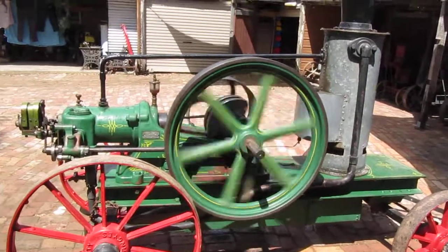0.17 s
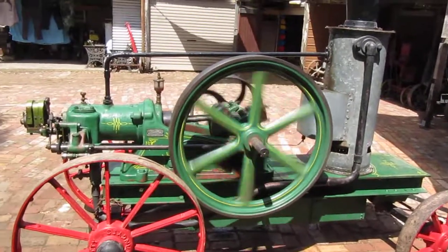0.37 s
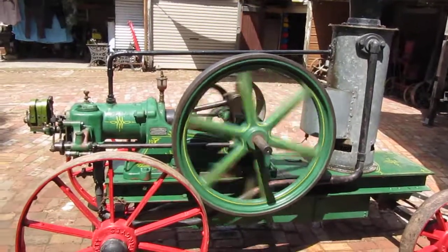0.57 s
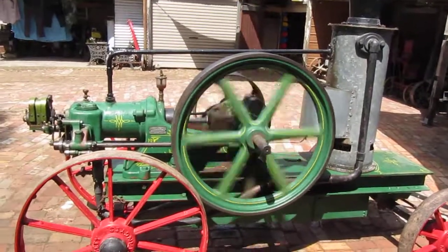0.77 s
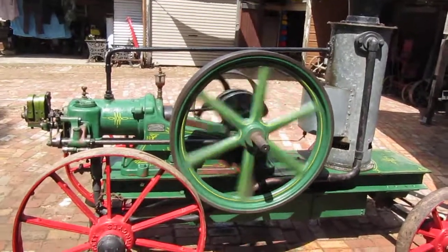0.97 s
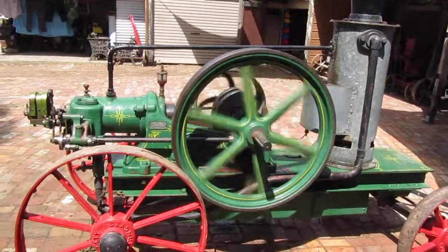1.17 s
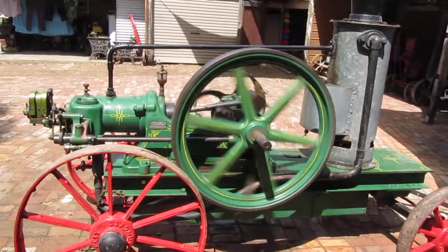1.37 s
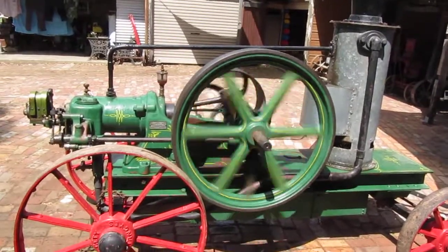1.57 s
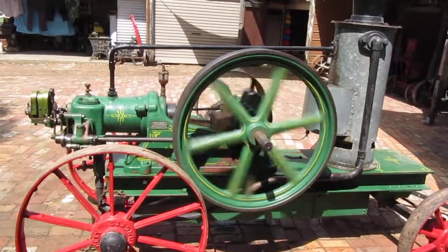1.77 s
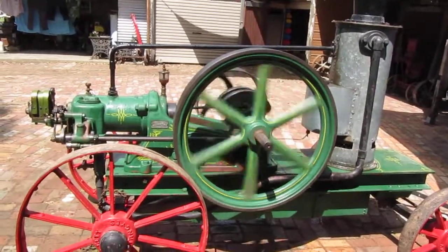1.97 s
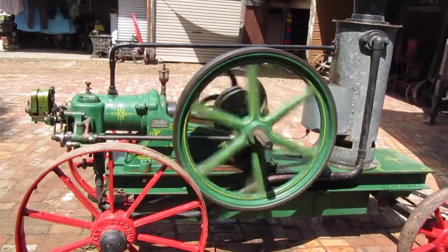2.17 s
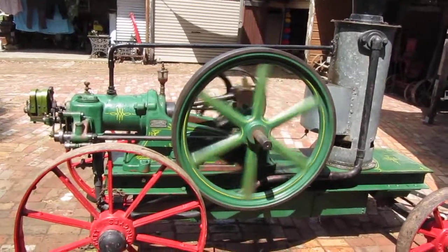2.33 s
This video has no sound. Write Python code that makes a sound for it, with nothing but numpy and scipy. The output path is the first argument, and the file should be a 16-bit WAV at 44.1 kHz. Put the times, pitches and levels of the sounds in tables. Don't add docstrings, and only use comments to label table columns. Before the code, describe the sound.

Close by in a paved yard, a slow stationary engine's iron parts click, ring and rattle over a low shudder; it mostly puffs and hisses, barking once midway and again at the abrupt end.

```python
import sys
import numpy as np
from scipy import signal
from scipy.fft import rfft, irfft, next_fast_len
from scipy.io import wavfile
from scipy.ndimage import uniform_filter1d

SR = 44100
rng = np.random.default_rng(int(sys.argv[2]) if len(sys.argv) > 2 else 0)


def waveform_to_disk(signal):
    frames = np.transpose(np.atleast_2d(signal))
    scaled = np.clip(frames, -1, 1) * 32767
    samples = np.round(scaled).astype(np.int16)
    wavfile.write(sys.argv[1], SR, samples)


def gain_from_db(level_db):
    decades = np.asarray(level_db, float) / 20
    return 10 ** decades


N = 105884

# (pitch [Hz], width [Hz], boost [dB])
PIPE = [(588, 35, 6), (720, 50, 4.5), (974, 61, 10), (1223, 58, 8.5), (2286, 59, 7.5), (2585, 180, 8),
        (4630, 150, 6)]
# (pitch [Hz], width [Hz], boost [dB])
PORT = [(1450, 90, 6), (2150, 80, 5), (4000, 200, 8), (7200, 250, 5.5), (8600, 540, 6)]
# (attack [s], t60 [s], ring [dB], offset [dB], crack [dB], click [dB],
# hardness [Hz]), then rebounds (delay [s], level [dB]); every contact table has this layout
TICK_HIT = (.0002, 0.24, -30, -16, 5.5, 11, 14000), [(.005, -14.5)]


def unit(x):
    return x / np.sqrt(np.mean(x ** 2))


def noise(tone, peaks=(), source=None):
    size = next_fast_len(N)
    hz = np.arange(1, size // 2 + 2) * SR / size
    tone = np.array(tone)
    db = np.interp(np.log(hz), np.log(tone[:, 0]), tone[:, 1])
    db = db - 40 * np.clip(np.log2(tone[0, 0] / hz), 0, 3)
    for peak_hz, width, boost in peaks:
        db = db + boost / (1 + (2 * (hz - peak_hz) / width) ** 2)
    if source is None:
        source = rng.standard_normal(size)
    return unit(irfft(rfft(source, size) * gain_from_db(db), size)[:N])


def shape(start, attack, t60, hold=0.):
    out = np.zeros(N)
    first = int(start * SR) + 1
    last = min(N, first + int((attack + hold + t60) * SR))
    t = np.arange(first, last) / SR - start
    rise = np.sin(np.clip(t / max(attack, 1e-4), 0, 1) * np.pi / 2) ** 2
    out[first:first + len(t)] = rise * gain_from_db(-60 * np.clip(t - attack - hold, 0, None) / t60)
    return out


def flicker(rate, db):
    k = int(SR / rate)
    wander = uniform_filter1d(uniform_filter1d(rng.standard_normal(N), k), k)
    return gain_from_db(db * unit(wander))


def thump(s, db, hz, t60):
    return gain_from_db(db) * shape(s, 0.0081, t60) * np.sin(2 * np.pi * hz * (np.arange(N) / SR - s))


def ring(x, modes):
    longest_ring_s = .14
    out = 0
    for hz, db, t60 in modes:
        r = np.exp(-np.log(1000) / (min(t60, longest_ring_s) * SR))
        w = 2 * np.pi * hz / SR
        out = out + gain_from_db(db) * signal.lfilter([0, np.sin(w)], [1, -2 * r * np.cos(w), r * r], x + 1e-18)
    return out


def part(hits, tone, contact, modes=()):
    (attack, t60, ring_db, offset_db, crack_db, click_db, hard_hz), rebounds = contact
    blows = []
    for s, db in hits:
        for after, more_db in [(0.00053, 0)] + rebounds:
            blows.append((s + after, db + offset_db + more_db))
    blows = np.array(blows)

    def every(decay):
        return sum(gain_from_db(db) * shape(s, attack, decay) for s, db in blows)

    scrape = every(.005) * rng.standard_normal(N) / np.sqrt(SR * (0.00026 + attack / 2))
    scrape = signal.lfilter(*signal.butter(2, min(hard_hz, SR / 3), fs=SR), scrape)
    rattle = every(t60) * flicker(980, 1.3) + gain_from_db(crack_db) * every(0.014)
    clicks = np.zeros(N)
    clicks[((blows[:, 0] + 2 * attack) * SR).astype(int)] = gain_from_db(blows[:, 1] + click_db)
    coloured = noise(tone, source=clicks)
    clicks = coloured * clicks.max() / np.abs(coloured).max()
    boosts = [(hz, 0.072 * hz, max(8.5 + db / 2, 0)) for hz, db, _ in modes]
    return clicks + rattle * noise(tone, boosts) + gain_from_db(ring_db) * ring(scrape, modes)


def frame():
    # (time [s], level [dB])
    shake = [(0., -51.5), (.15, -50), (.26, -47.5), (.32, -40), (.37, -49), (.44, -39.5), (.51, -48),
             (.79, -50), (.82, -43.5), (1.0, -43.5), (1.12, -47), (1.3, -46.5), (1.63, -53), (1.8, -43.5),
             (1.95, -43), (2.06, -45), (2.12, -45), (2.249, -43.5)]
    # (pitch [Hz], level [dB])
    frame_tone = [(25, -9), (60, -6), (88, -6), (105, 2.5), (125, -1.5), (170, -14), (300, -21.5),
                  (900, -81)]
    # (time [s], level [dB])
    jolts = [
        (0.299, -33),
        (0.802, -36),
        (0.841, -42),
        (.932, -41),
        (1.822, -30.5),
        (1.915, -47),
    ]
    s, db = np.array(shake).T
    shudder = gain_from_db(np.interp(np.arange(N) / SR, s, db) + 2.5) * flicker(33, 2.06) * noise(frame_tone)
    return shudder + sum(thump(s, db, 107.8, 0.074) for s, db in jolts)


def yard():
    # (pitch [Hz], level [dB])
    yard_tone = [(150, 3.5), (231, -8.5), (375, 6.5), (508, -5), (1720, -10), (6940, -17), (11000, -24),
                 (16500, -60.5)]
    level_db = -39 - 6
    return gain_from_db(level_db) * flicker(22, 1.7) * noise(yard_tone, PIPE + PORT[:2])


def pipe_hum():
    # (time [s], level [dB])
    hum = [(0., -49.5), (.12, -75), (.17, -42.5), (.25, -40), (.32, -53), (.42, -45), (.48, -55),
           (.63, -51.5), (.7, -44.5), (.95, -45), (1.14, -59), (1.26, -47), (1.38, -54), (1.62, -53),
           (1.75, -36), (1.82, -45), (2.14, -57), (2.25, -45)]
    # (pitch [Hz], level [dB])
    hum_tone = [(220, -16.5), (310, -6), (371, -0.5), (430, -5), (520, -26), (1000, -70)]
    level_db = np.interp(np.arange(N) / SR, *np.array(hum).T)
    return gain_from_db(level_db) * flicker(30, 4.0) * noise(hum_tone)


def latch():
    # (time [s], peak [dB])
    hits = [
        (0.0028, -11),
        (0.5018, -9),
        (1.5166, -13),
    ]
    # (pitch [Hz], level [dB])
    tone = [(290, -38.5), (500, -12.5), (1150, -12.5), (1760, -8.5), (4620, -11), (9890, -20),
            (16500, -45.5)]
    contact = (.0002, 0.09, 2, -20.5, 4, 15.5, 11997), [(.003, -8), (.005, -6.5), (.0082, -0.5)]
    # (pitch [Hz], level [dB], t60 [s])
    modes = [(412, -4.5, 0.087), (1780, -4, 0.039), (2720, -4, 0.034), (3100, -7, .08), (3343, -3.5, 0.083),
             (4370, -0.5, .045), (4820, -6, 0.07), (5080, -7, 0.086), (7400, -9, .03), (7800, -9, 0.036)]
    return part(hits, tone, contact, modes)


def igniter_trip():
    # (time [s], peak [dB])
    hits = [
        (.0347, -11),
        (.5367, -9),
        (1.052, -10),
        (1.549, -13.5),
        (2.0531, -11),
    ]
    # (pitch [Hz], level [dB])
    tone = [(500, -21.5), (1500, -7), (3020, -7), (5430, -2.5), (8200, -8.5), (10500, -16), (15000, -25.5),
            (16500, -50)]
    contact = (.0002, 0.1144, 1.5, -20.5, 7.5, 18, 14001), [(.0012, -3), (.009, -16.5), (.017, -18)]
    # (pitch [Hz], level [dB], t60 [s])
    modes = [(1747, -4.5, 0.03), (2706, -10, 0.058), (3300, -10, 0.034), (3960, -1.5, 0.02),
             (4530, -7.5, 0.074), (5300, -9, .1), (5510, -10, 0.22), (6830, -10.5, 0.13),
             (7400, -11.5, .05), (8220, -4.5, 0.029), (9740, -11.5, 0.039)]
    return part(hits, tone, contact, modes)


def igniter_slide():
    # (time [s], peak [dB])
    hits = [
        (.106, -29.5),
        (.599, -28),
        (1.11, -29.5),
        (1.613, -31.5),
        (2.114, -27.5),
    ]
    # (pitch [Hz], level [dB])
    tone = [(1500, -18.5), (3500, -4.5), (5500, -6), (7000, 0), (8500, -4), (12000, -14.5), (16500, -40)]
    contact = (.007, 0.07, -30, -16.5, -9, -30, 9000), [(.011, 2.5)]
    return part(hits, tone, contact)


def cam_knock():
    # (time [s], peak [dB])
    hits = [
        (.143, -15.5),
        (.648, -15),
        (1.1615, -15),
        (1.6555, -17),
        (2.160, -13.5),
    ]
    # (pitch [Hz], level [dB])
    tone = [(300, -14), (700, -1), (1680, -6), (2220, -6), (4500, -5), (7270, -5.5), (10000, -24),
            (16500, -67.5)]
    contact = (.0003, 0.166, 2.5, -24.5, 8, 14, 8000.5), [(.0018, -1.5), (.0036, 1.2)]
    # (pitch [Hz], level [dB], t60 [s])
    modes = [(1451, -4, 0.11), (1717, -4, .08), (2860, -3.5, 0.056), (4441, -7.5, 0.035), (7150, -5, .03)]
    return part(hits, tone, contact, modes)


def small_ticks():
    # (time [s], peak [dB])
    hits = [(.1715, -33.5), (.383, -26), (.6734, -35), (.82, -29), (.893, -39), (1.0276, -35.5),
            (1.3204, -30), (1.6861, -32.5), (1.8971, -32), (2.0258, -44.5)]
    # (pitch [Hz], level [dB])
    tone = [(2500, -22.5), (5000, -4.5), (9000, -2), (12000, -17), (15000, -19.5), (16500, -45)]
    return part(hits, tone, TICK_HIT)


def missed_puffs():
    # (time [s], level [dB])
    missed = [
        (0.204, -31),
        (0.711, -30),
        (1.72, -32),
    ]
    # (pitch [Hz], level [dB])
    puff_tone = [(150, -13), (280, -5.5), (375, 3.5), (470, -11), (1000, -10.5), (2760, -15.5),
                 (8790, -30.5), (16500, -68)]
    attack_s, hold_s, t60_s = 0.011, .035, .22
    puffs = sum(gain_from_db(db) * shape(s, attack_s, t60_s, hold_s) for s, db in missed)
    return noise(puff_tone, PIPE) * puffs


def pawl():
    # (time [s], peak [dB])
    hits = [
        (.2094, -24),
        (.7158, -30),
        (1.724, -27.5),
    ]
    # (pitch [Hz], level [dB])
    tone = [(4000, -24.5), (6500, -8), (9000, 0.), (10500, -10.5), (16500, -58)]
    return part(hits, tone, TICK_HIT)


def rocker():
    # (time [s], peak [dB])
    hits = [(.2553, -24.5), (.278, -33), (.376, -19), (.4254, -17.5), (.7647, -23), (.888, -21),
            (.9395, -17), (1.3925, -24.5), (1.441, -19.5), (1.8916, -18.5), (1.943, -18.5)]
    # (pitch [Hz], level [dB])
    tone = [(700, -21), (1700, 1), (3400, -7), (5500, -10), (16500, -76)]
    contact = (.0004, 0.0749, 6.5, -17, 4, 10, 4499.5), [(.0025, -3), (.006, -7)]
    # (pitch [Hz], level [dB], t60 [s])
    modes = [(1343, -8.5, .06), (1444, -5.5, .09), (1731, -8.5, .07), (1978, -6, 0.071), (2176, -9, .08),
             (3036, -14.5, .04), (3350, -10.5, 0.033), (3700, -15, .04)]
    return part(hits, tone, contact, modes)


def valve_clack():
    # (time [s], peak [dB])
    hits = [
        (.2888, -10.5),
        (.7978, -9.5),
        (1.3058, -20),
        (1.8042, -13),
    ]
    # (pitch [Hz], level [dB])
    tone = [(500, -25.5), (1100, -17.5), (1700, -2.5), (2500, -7.5), (3400, -5), (8540, -24.5),
            (16500, -71.5)]
    contact = (.0002, .07, 7.5, -28, 7, 24.5, 5001), [(.0016, 7), (.0049, 3.5), (.012, -3.5)]
    # (pitch [Hz], level [dB], t60 [s])
    modes = [(1352, -6.5, 0.089), (1453, -5.5, 0.084), (1735, -8.5, 0.071), (1987, -4, 0.05),
             (2140, -11.5, 0.074), (3140, -14, 0.086), (3305, 1, .045), (3660, -11, 0.11),
             (4210, -15.5, 0.074), (5560, -11, .05), (6900, -11.5, 0.017)]
    return part(hits, tone, contact, modes)


def air_hiss():
    # (start [s], stop [s], level [dB])
    strokes = [
        (0.295, 0.404, -36),
        (.81, 0.92, -33.5),
        (1.32, 1.423, -42),
        (1.814, 1.935, -33.5),
    ]
    # (pitch [Hz], level [dB])
    air_tone = [(150, -11.5), (709, -6.5), (1500, -4.5), (2400, -9), (5500, -10), (8000, -11),
                (11000, -18.5), (14700, -36), (16500, -60.5)]
    attack_s, t60_s = 0.049, 0.17
    flow = sum(gain_from_db(db) * shape(a, attack_s, t60_s, b - a - attack_s) for a, b, db in strokes)
    return flow * flicker(60, 1.7) * flicker(500, 2.3) * noise(air_tone, PORT)


def valve_scuff():
    # (time [s], peak [dB])
    hits = [
        (.4062, -20),
        (.912, -22.5),
        (1.4215, -27),
        (1.913, -23),
    ]
    # (pitch [Hz], level [dB])
    tone = [(1500, -16.5), (4000, 2), (5600, 2), (6500, -4.5), (8500, -0.5), (12000, -16.5), (16500, -41)]
    contact = (.003, 0.1169, -30, -14.5, -0.5, -29, 9000), [(.008, -1.5)]
    return part(hits, tone, contact)


def dull_knock():
    # (time [s], peak [dB])
    hits = [
        (1.013, -28),
        (2.02, -33),
    ]
    # (pitch [Hz], level [dB])
    tone = [(340, -18.5), (440, -1), (560, -21.5), (6000, -59)]
    contact = (.006, 0.05, -40, -9.5, -21, -30, 3000), [(.012, -1.5)]
    return part(hits, tone, contact)


def exhaust_barks():
    # (time [s], blow [dB], note [dB], thump [dB])
    fired = [
        (1.175, -18, -10, -19),
        (2.173, -18, -8.5, -20),
    ]
    # (pitch [Hz], level [dB])
    blow_tone = [(200, -9.5), (375, 0.5), (480, -13), (991, -6.5), (4690, -9.5), (7000, -10.5),
                 (10700, -19), (15000, -37), (16500, -65.5)]
    blow_lag_s, blow_attack_s, blow_hold_s, blow_t60_s = 0.0026, .011, 0.0076, .12
    tail_db, tail_t60_s = -17, 0.57
    note_hz, note_attack_s, note_hold_s, note_t60_s = 383.7, .007, 0.0025, 0.033
    t = np.arange(N) / SR
    gas = noise(blow_tone, PIPE)
    out = np.zeros(N)
    for s, blow_db, note_db, thump_db in fired:
        roar = shape(s + blow_lag_s, blow_attack_s, blow_t60_s, blow_hold_s)
        roar = roar + gain_from_db(tail_db) * shape(s + blow_lag_s, blow_attack_s, tail_t60_s)
        out = out + gain_from_db(blow_db) * roar * gas * flicker(700, 0.58)
        swell = gain_from_db(note_db) * shape(s, note_attack_s, note_t60_s, note_hold_s)
        out = out - swell * np.sin(2 * np.pi * note_hz * (t - s))
        out = out + thump(s, thump_db, 70, 0.036)
    return out


def wall_echo(engine):
    level_db, t60_s, low_hz, high_hz = -15.5, 0.41, 596, 5000
    t = np.arange(SR // 2) / SR
    walls = rng.standard_normal(len(t)) * gain_from_db(-60 * t / t60_s) * (t > .006)
    walls = signal.lfilter(*signal.butter(2, [low_hz, high_hz], "band", fs=SR), walls)
    return gain_from_db(level_db) * signal.fftconvolve(engine, walls / np.sqrt(np.sum(walls ** 2)))[:N]


def scene():
    iron = latch() + igniter_trip() + cam_knock() + small_ticks() + pawl()
    iron = iron + rocker() + valve_clack() + valve_scuff() + dull_knock()
    gas = pipe_hum() + missed_puffs() + air_hiss() + exhaust_barks()
    engine = iron + gas
    mix = engine + wall_echo(engine) + frame() + yard() + igniter_slide()
    return mix[None]


def low_pass(x):
    return signal.sosfilt(signal.butter(12, 16800, fs=SR, output="sos"), x)


def record(dry):
    stop_s = 2.2495
    mix = dry * (np.arange(N) < stop_s * SR)
    return low_pass(mix)


dry = scene()
out = record(dry)
waveform_to_disk(out)
```